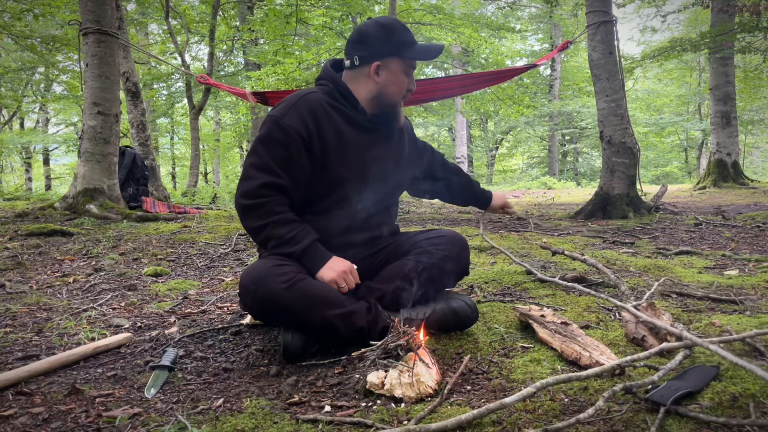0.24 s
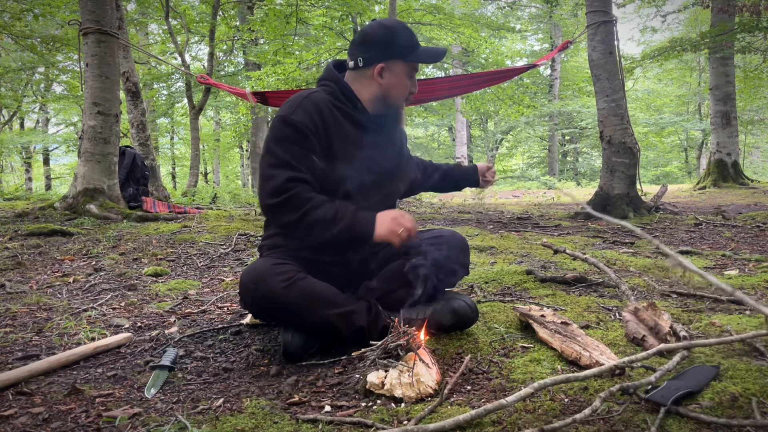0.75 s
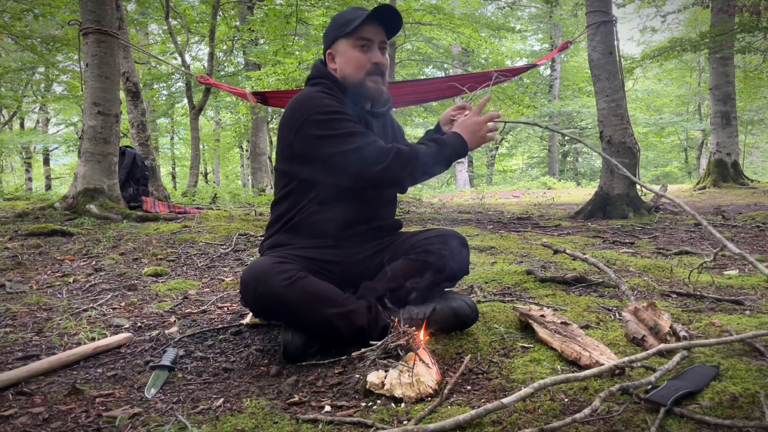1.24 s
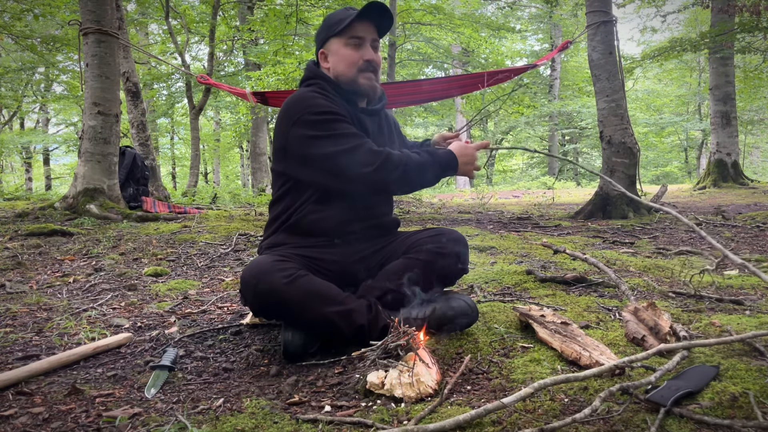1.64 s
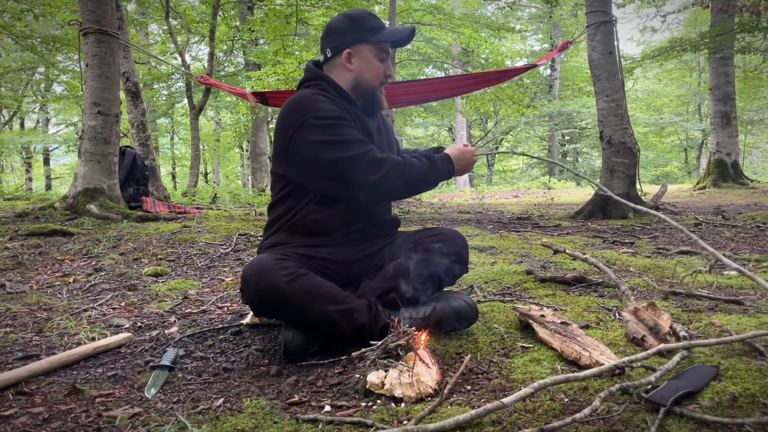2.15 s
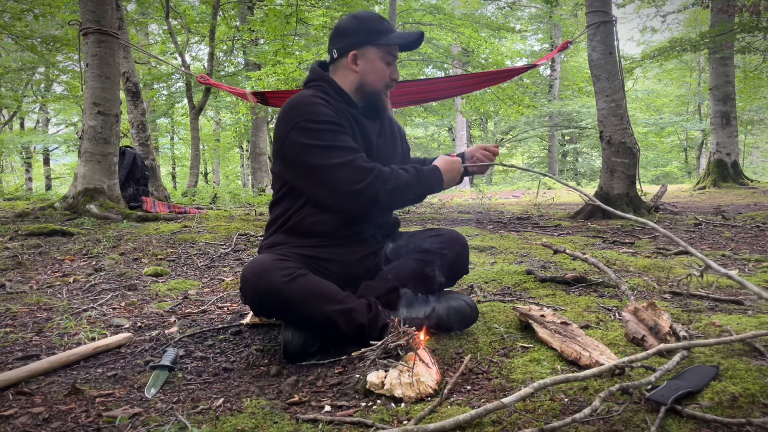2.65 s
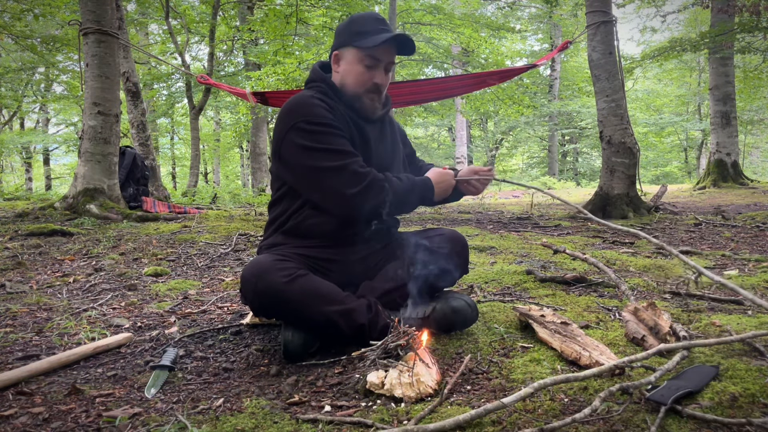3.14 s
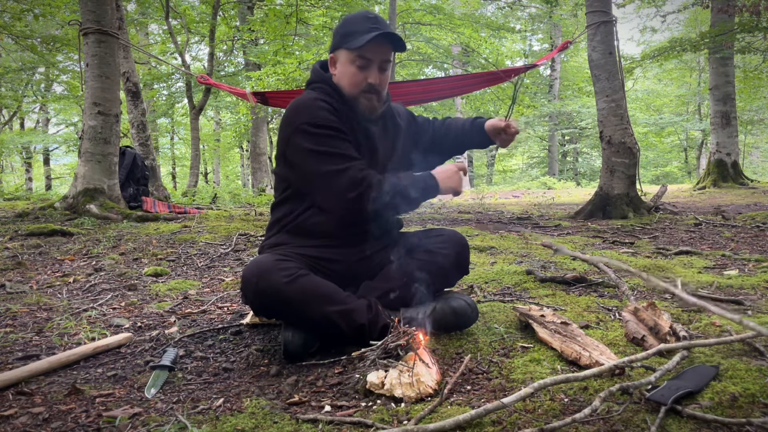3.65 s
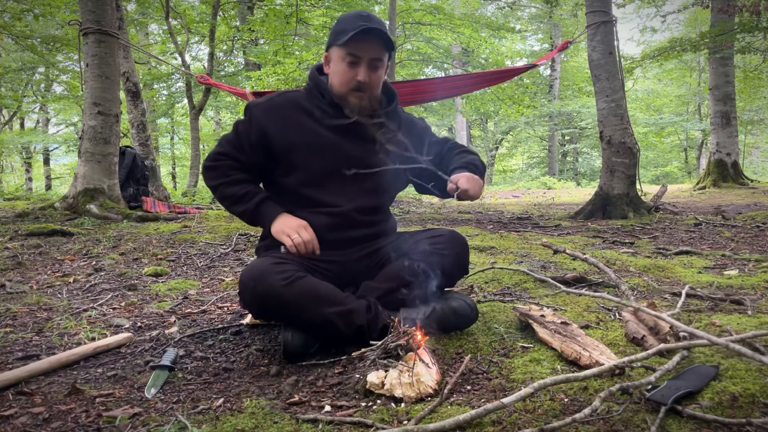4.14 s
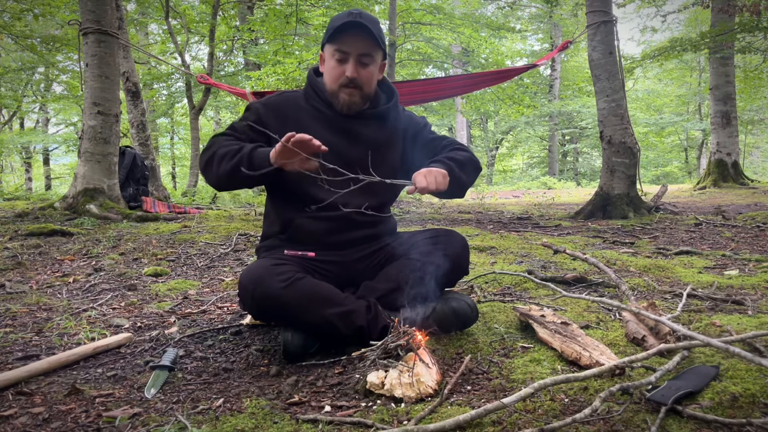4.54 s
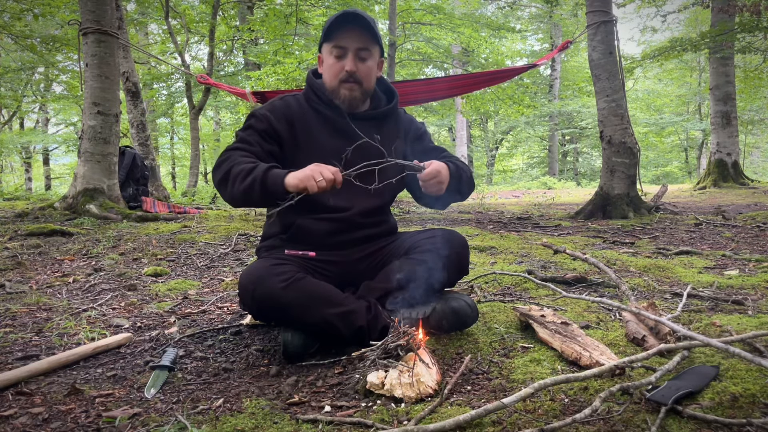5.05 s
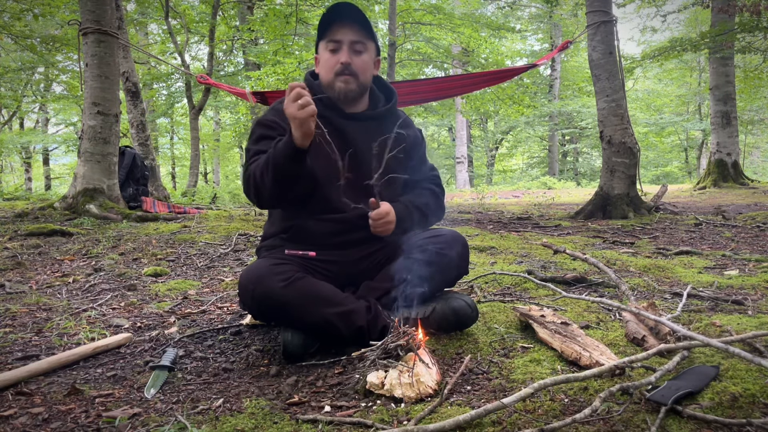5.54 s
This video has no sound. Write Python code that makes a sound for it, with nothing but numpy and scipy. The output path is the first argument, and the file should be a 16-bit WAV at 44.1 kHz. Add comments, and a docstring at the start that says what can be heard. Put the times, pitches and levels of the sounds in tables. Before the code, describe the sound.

Brittle twigs break one after another, each a dry, bright, millisecond-short crack followed by a scattered woodland echo of under half a second. Quiet rustling, crisp ticks and dull soft bumps accompany the branch being pulled about, busiest around two seconds and thinning after four. The stereo microphones stand a few metres off; the background is nearly silent, with only faint leaf hiss and low rumble.

```python
"""In a beech wood, a few metres from a phone, someone drags a dry branch over the litter and snaps twigs. Each
snap is a few milliseconds of tearing fibres that leave the stub ringing; the trunks scatter it back. Each
stroke of the branch drives crunch, leaf hiss, stray ticks and a low rumble; now and then it bumps the ground.
Shaped noise makes the fibres, leaves, rumble and faint canopy hiss; decaying sines make the stubs and twiglets."""
import sys
import numpy as np
from scipy import signal
from scipy.fft import rfft, irfft, next_fast_len
from scipy.io import wavfile
from scipy.ndimage import uniform_filter1d

SR = 44100
rng = np.random.default_rng(int(sys.argv[2]) if len(sys.argv) > 2 else 0)


def store_wav(level_fs):
    """Save 16-bit WAV to argv[1]."""
    pcm = np.round(np.clip(np.atleast_2d(level_fs), -1, 1) * 32767)
    wavfile.write(sys.argv[1], SR, pcm.T.astype(np.int16))


N = 255339

# Fibre bundles giving way. Each row: break in seconds, relative level in dB, build-up in ms, fade in ms,
# low cut in Hz, brightness in dB per octave above 1500 Hz, relative share sent into the trees in dB.
FRACTURES = [(0.0915, -9.5, 1.94, .7, 2318, -0.5, -5.5), (1.4511, -20, 0.59, 1.4, 1810, -1, 1),
             (1.4530, -22, 0.63, 1.2, 1000, -1, -8), (2.2567, -38, 0.49, 0.49, 300, 13, 3),
             (2.2576, -28, 0.3, 0.61, 300, 2, -0.5), (2.2625, -50, 1.5, 5, 300, -5, -2),
             (2.2710, -49.5, 0.7, 3.3, 400, -8, -3), (3.1397, -33, 1.04, 0.64, 1510, 2, -6),
             (3.1448, -17.5, 0.64, 0.41, 1206, 6, -3.5), (3.1483, -30.5, 1.3, 0.62, 1010, 0.5, -2),
             (3.1610, -38, .4, 1.2, 1503, 2, 0.5), (5.3140, -59, .4, 2.9, 1500, 1.5, 2.5),
             (5.3263, -22.5, 0.16, 2.2, 1000, 2, -2), (5.33, -17.5, 0.079, 0.97, 900, 7, 5.5),
             (5.3341, -32, .2, 1.6, 594, -6, 3.5)]
# Freed stubs springing back. Each row: start in seconds, pitch in Hz, level in dB, 60 dB decay time in seconds.
STUBS = [(0.0912, 2630, -18.5, .018), (0.0912, 1900, -26.5, .009), (0.0912, 1560, -29, .011),
         (0.0898, 4700, -19.5, 0.012), (0.0893, 6410, -10.5, .012), (0.0945, 480, -51.5, 0.085),
         (1.4524, 2366, -24.5, 0.012), (1.4522, 1490, -33.5, 0.012), (1.4508, 8800, -22, .012),
         (1.4540, 353, -51.5, 0.073), (2.2574, 6840, -31.5, 0.013), (2.2580, 1250, -40.5, 0.017),
         (3.1447, 2095, -42, 0.027), (3.1447, 1820, -39.5, .014), (3.1449, 1440, -46.5, 0.016),
         (3.1885, 1800, -47, 0.022), (5.3270, 2440, -21.5, 0.015), (5.3266, 4230, -28.5, 0.016),
         (5.3266, 6740, -24, 0.017), (5.3275, 1195, -39.5, 0.0148), (5.3290, 334, -54.5, 0.056)]
# Clearest knocks of twig on twig. Each row: start in seconds, nominal peak in dB, ring in Hz,
# brightness in dB per octave above 1500 Hz.
TICKS = [(0.0024, -34.5, 3750, 3.5), (0.3636, -47, 4600, -3), (0.399, -42, 3930, -2),
         (0.5558, -39.5, 5100, 0.5), (0.5843, -37, 6340, 0), (0.602, -33.5, 6580, 1),
         (0.6179, -37, 3630, 0), (0.8995, -39, 4700, 3), (0.9621, -43.5, 3440, 0.5),
         (0.9988, -48.5, 2460, -7.5), (1.1863, -49, 3118, -2.5), (1.616, -46, 3100, 1),
         (1.7989, -53.5, 1880, -2), (2.0602, -34.5, 3320, -1), (2.0823, -36, 3600, 4.5),
         (2.1368, -40, 3220, -9), (2.2774, -38.5, 3020, -7.5), (2.3376, -44.5, 4700, 5.5),
         (2.9182, -37.5, 4940, 5), (2.9302, -41, 3400, 2.5), (3.1876, -35, 2110, 1.5),
         (3.5119, -43.5, 5030, -1.5), (3.5658, -37, 4950, 2.5), (3.6532, -46, 5780, 2.5),
         (3.7332, -33, 5800, -1.5), (3.8192, -49, 4600, 1), (3.925, -46.5, 5300, -2),
         (4.5593, -56, 2560, 4.5), (4.671, -58.5, 2494, 0.5), (4.7054, -54.5, 5960, 7.5),
         (4.821, -52, 2523, 2), (5.0268, -48.5, 2510, 3), (5.4505, -38.5, 2420, 4)]
# The branch bumps the soil or knocks in the hands. Each row: start in seconds, pitch in Hz,
# envelope peak in dB, length in seconds (twice the time to the peak).
BUMPS = [(0.090, 240, -46, 0.0019), (0.092, 701, -45.5, 0.0018), (0.585, 750, -52.5, .002),
         (1.453, 215, -50, 0.0039), (2.260, 470, -50.5, 0.0051), (2.262, 219, -51.5, 0.014),
         (2.287, 129.3, -48, 0.019), (2.290, 72, -48.5, .045), (3.763, 79.2, -50, 0.041),
         (4.87, 67, -57, 0.038)]
# Bark rubbing along bark. Each row: middle in seconds, length in seconds, relative level in dB, ring in Hz.
SCRAPES = [(0.049, 0.0076, -61, 3630), (0.616, 0.017, -54.5, 5200), (1.18, 0.052, -74, 3160),
           (2.09, 0.15, -61.5, 3200), (2.268, 0.032, -65, 1680), (2.539, 0.014, -72, 4500),
           (3.509, 0.058, -74, 5125), (3.59, 0.022, -64, 5060), (3.868, 0.046, -69.5, 4660),
           (4.715, 0.026, -83, 2600), (5.026, .012, -68, 2520), (5.149, .04, -81, 2510)]
# Pushes and pulls of the branch. Each row: peak in seconds, rise in seconds, fall in seconds,
# then the relative drive in dB of crunch, leaf hiss and low rumble.
STROKES = [(0.396, 0.069, .07, -56, -64.5, -60), (0.46, 0.065, 0.22, -62, -68, -61),
           (0.611, 0.052, 0.051, -57, -74, -63.5), (0.87, 0.17, .11, -64, -71, -60),
           (1.18, .06, .1, -72, -85, -59), (1.55, .04, .04, -70, -90, -56.5),
           (2.095, .15, 0.14, -55, -62, -55.5), (2.275, 0.023, 0.063, -52.5, -62, -51),
           (2.37, 0.069, 0.21, -68.5, -76, -58), (2.98, 0.044, 0.1, -70, -74.5, -61.5),
           (3.275, .03, 0.041, -65, -76, -68), (3.51, .14, 0.1, -68.5, -72.5, -55.5),
           (3.745, .09, 0.11, -61, -69, -58.5), (3.88, 0.12, 0.1, -65.5, -76, -60.5),
           (4.0, .06, .25, -78, -79.5, -73), (4.72, .05, .11, -84, -83, -74),
           (5.41, .1, .07, -65.5, -68.5, -69)]
# The arms recoil after some snaps with a low rumble. Each row: peak in seconds, relative level in dB.
RECOILS = [(0.12, -56.5), (1.47, -57), (3.19, -59.5), (5.5, -64.5)]

# Spectrum of tearing fibres. Each row: frequency in Hz, relative level in dB.
FIBRE_COLOUR = [(150, -20), (400, -18), (800, -20), (1300, -13.5), (2200, -6.5), (3200, -9), (4300, -3.5),
                (6500, -1), (8000, 1), (9500, -2), (11800, -1.5), (14200, -3.5), (16000, -7.5)]
# Spectrum of a twig contact. Each row: frequency in Hz, relative level in dB.
TICK_COLOUR = [(200, -11), (800, -9.5), (2000, -2), (5000, -1), (8000, -1.5), (13000, -2), (14500, -7.5),
               (16000, -17)]
# Spectrum of crunching litter. Each row: frequency in Hz, relative level in dB.
LITTER_COLOUR = [(200, 2), (400, -0.5), (800, -3.5), (1500, -2.5), (3000, -1), (5500, -5), (8000, 2),
                 (10000, -12), (16000, -29)]
# Spectrum of the thinnest leaves. Each row: frequency in Hz, relative level in dB.
LEAF_HISS_COLOUR = [(5000, -31), (8000, -1), (10500, 7), (13000, -0.5), (14500, -11), (16000, -12.5)]
# Spectrum of the low rumble. Each row: frequency in Hz, relative level in dB.
RUMBLE_COLOUR = [(20, -31.5), (35, -18), (48, -7), (65, 0), (105, -5), (140, 0), (190, -10), (280, -15),
                 (450, -28), (900, -42.5), (3000, -71)]
# Spectrum of the canopy hiss. Each row: frequency in Hz, relative level in dB.
CANOPY_COLOUR = [(200, 5.5), (500, 5.5), (1000, 0), (1500, -2), (1900, 0), (2600, -7.5), (5000, -11),
                 (8000, -10.5), (12500, -15), (15000, -17)]
# What the trees send back. Each row: frequency in Hz, relative level in dB.
TREE_COLOUR = [(200, 1.5), (700, 4), (1200, 6), (1800, 1.5), (2600, 0.5), (5000, 2), (8000, -1.5),
               (13500, 0), (14800, -5.5), (16000, -15)]
# How unlike scattered sound is between left and right. Each row: frequency in Hz, side against mid in dB.
WIDTH = [(60, -14.5), (130, -12.5), (290, -8.5), (640, -3), (1400, -3.5), (3000, -4), (5000, -3),
         (7000, -10.5), (9000, -23.5), (15000, -23)]
# The phone's stereo processing. Each row: frequency in Hz, phase by which left leads in radians, left minus
# right in dB.
PHONE_STEREO = [(50, 0, 1.4), (300, -.1, 2.4), (650, -1.2, .7), (1300, -1.8, -1.8), (2200, 0, .2),
                (3400, 1.1, 2.6), (4800, .1, 2.6), (6400, -1.1, 1.8), (8300, -3.1, -.6),
                (10000, -4.5, 0), (12000, -6.3, 1), (13200, -7, 1.2), (15400, -9.5, .5)]

TOP_HZ = 16450
STROKE_RANGE_DB = 20  # a swell gains this much over its rise and loses it over its fall
HISS_STRETCH, RUMBLE_STRETCH = 2, 2.55  # thin leaves and heavy limbs start earlier and settle later than the crunch
RECOIL_RISE_S, RECOIL_FALL_S = .2, .4
TICK_CHATTER_S, TICK_RING_WIDTH_HZ = .012, 230


def amp(db):
    """Decibels to gain."""
    return np.exp(np.asarray(db) * np.log(10) / 20)


def unit(x):
    """Scale to rms 1."""
    return x / np.sqrt(np.mean(x ** 2) + 1e-30)


def along(points, hz, axis=1):
    """Read one column of a spectrum table on a log-frequency axis."""
    points = np.array(points, float)
    return np.interp(np.log(hz + 1), np.log(points[:, 0]), points[:, axis])


def tint(x, points, tilt_db=0):
    """Causal filter with the given spectrum, tilted by tilt_db an octave above 1500 Hz."""
    size = min(x.shape[-1], 8192)
    hz = np.fft.rfftfreq(size, 1 / SR)
    octaves = np.log2(np.maximum(hz, 1500) / 1500)
    # folding the cepstrum onto positive times makes the filter minimum-phase
    cepstrum = irfft(np.log(amp(along(points, hz) + tilt_db * octaves)))
    cepstrum[1:size // 2] *= 2
    cepstrum[size // 2 + 1:] = 0
    response = irfft(np.exp(rfft(cepstrum)))[:size // 2]
    filtered = signal.oaconvolve(x, np.array(response, ndmin=x.ndim), axes=-1)
    return filtered[..., :x.shape[-1]]


def resonate(x, hz, width_hz):
    """One resonance, gain 1 at its centre."""
    b, a = signal.iirpeak(min(hz, SR / 3), max(hz / width_hz, 1), SR)
    return signal.lfilter(b, a, x)


def add(track, s, sound):
    """Mix a sound into a track from time s on."""
    start = int(round(s * SR))
    sound = sound[max(-start, 0):N - start]
    first = max(start, 0)
    track[first:first + len(sound)] += sound


def spread(pair):
    """Two unrelated signals become sound that arrives from many sides."""
    side = tint(pair[1], WIDTH)
    return np.array([pair[0] + side, pair[0] - side])


def crackle(size, scatter_db):
    """Dense tiny clicks of very unequal strength, rms 1."""
    clicks = rng.standard_normal(size)
    strength_db = scatter_db * np.minimum(rng.exponential(size=size), 5)
    return unit(clicks * amp(strength_db))


def swell(s, rise_s, fall_s, db):
    """Gain that climbs evenly in dB to a peak at time s and falls away again."""
    t = np.arange(N) / SR - s
    return amp(db - STROKE_RANGE_DB * np.minimum(np.maximum(-t / rise_s, t / fall_s), 10))


def snaps(splinter_db=-28, splinter_s=0.016):
    """Fibres tear in a growing avalanche, then die away in splinters; returns direct sound and what enters the trees."""
    direct, sent = np.zeros(N), np.zeros(N)
    lead_s = .006  # room for the build-up before the break
    t = np.arange(2048) / SR - lead_s
    for s, db, build_ms, fade_ms, low_hz, bright_db, sent_db in FRACTURES:
        slope_s = np.where(t < 0, build_ms, fade_ms) / 1000
        avalanche = np.exp(-abs(t) / slope_s) * (t > -2 * slope_s)
        splinters = (t > 0) * amp(splinter_db) * np.exp(-abs(t) / splinter_s)
        envelope = avalanche + splinters
        fibres = tint(crackle(len(t), scatter_db=.8) * envelope, FIBRE_COLOUR, bright_db)
        # a thin twig radiates no long waves
        low_cut = signal.butter(2, low_hz, "high", fs=SR, output="sos")
        tear = unit(signal.sosfilt(low_cut, fibres))
        tear = tear * np.sqrt(np.mean(envelope ** 2)) * amp(db)
        add(direct, s - lead_s, tear)
        add(sent, s - lead_s, tear * amp(sent_db))
    return direct, sent


def stubs(rise_s=.0005):
    """Each broken end rings briefly as a decaying sine."""
    out, t = np.zeros(N), np.arange(2048) / SR
    for s, hz, db, t60_s in STUBS:
        envelope = (1 - np.exp(-t / rise_s)) * np.exp(-np.log(1000) * t / t60_s)
        add(out, s, amp(db) * np.sin(2 * np.pi * hz * t) * envelope)
    return out


def motion(jerk_db=2.5):
    """Gains of crunch, leaf hiss and rumble: each stroke drives all three; catching and letting go jerks the first two."""
    power = np.zeros((3, N))
    for s, rise_s, fall_s, *levels in STROKES:
        for layer, db, stretch in zip(power, levels, (1, HISS_STRETCH, RUMBLE_STRETCH)):
            layer += swell(s, rise_s * stretch, fall_s * stretch, db) ** 2
    crunch, hiss, heave = np.sqrt(power)
    wander = unit(uniform_filter1d(rng.standard_normal(N), size=700))
    jerks = unit(amp(jerk_db * wander))
    return crunch * jerks, hiss * jerks, heave


def rustle(crunch, hiss, body_db=-1.0, hiss_db=-0.5):
    """Dry leaves crumple in countless grains under the moving branch; the thinnest ones hiss."""
    out = np.zeros((2, N))
    # leaves catch and let go, so the grains come in clumps
    wander = unit(uniform_filter1d(rng.standard_normal(N), size=130))
    clumps = unit(amp(3 * wander))
    layers = ((crunch, LITTER_COLOUR, body_db), (hiss, LEAF_HISS_COLOUR, hiss_db))
    for gain, colour, db in layers:
        grains = crackle((2, N), scatter_db=4) * clumps
        out += unit(spread(tint(grains, colour))) * gain * amp(db)
    return out


def ticks(rows, contact_s=.0008, chatter_db=-13, ring_db=10, rms_to_peak_db=-22.5):
    """A short scraping contact rings the twig and chatters briefly."""
    out, t = np.zeros(N), np.arange(2048) / SR
    for s, db, hz, bright_db in rows:
        stroke = t / contact_s * np.exp(1 - t / contact_s)
        envelope = stroke + amp(chatter_db) * np.exp(-t / TICK_CHATTER_S)
        contact = tint(crackle(len(t), scatter_db=3) * envelope, TICK_COLOUR, bright_db)
        tick = contact + amp(ring_db) * resonate(contact, hz, TICK_RING_WIDTH_HZ)
        add(out, s, unit(tick) * amp(db + rms_to_peak_db))
    return out


def stray_ticks(crunch, above_db=11.5, scatter_db=6, bright_db=0.5, count=100):
    """Small knocks at random moments, their strength following the branch's movement; rows like those of TICKS."""
    rows = []
    for k, (jitter, pitch, strength) in enumerate(rng.random((count, 3))):
        s = (k + jitter) / count * (N - 1) / SR
        movement_db = 20 * np.log10(crunch[int(s * SR)])
        db = movement_db + above_db + scatter_db * (2 * strength - 1)
        rows.append((s, db, 2500 * 2.5 ** pitch, bright_db))
    return rows


def twiglets(crunch, db=-0.5, ring_s=.002, scatter_db=4, count=1100):
    """Side shoots flick against the litter as the branch moves, each pinging at its own pitch."""
    out, t = np.zeros(N), np.arange(512) / SR
    for when, pitch, strength in rng.random((count, 3)):
        start = int(when * N)
        hz = 2000 * 3.6 ** pitch
        size_db = db + scatter_db * min(-np.log(1 - strength), 3)
        ping = np.sin(2 * np.pi * hz * t) * np.exp(-t / ring_s)
        add(out, start / SR, crunch[start] * amp(size_db) * ping)
    return out


def scrapes(slips_per_s=450):
    """Bark sticks and slips at uneven moments; every slip rings the twig."""
    out, t = np.zeros(N), np.arange(-SR // 6, SR // 6) / SR
    for s, length_s, db, hz in SCRAPES:
        slips = (rng.random(len(t)) < slips_per_s / SR) * rng.standard_normal(len(t))
        ring = resonate(resonate(slips, hz, hz / 5), hz, hz / 2)
        add(out, s + t[0], unit(ring) * amp(db) * np.exp(-(2 * t / length_s) ** 2))
    return out


def bumps():
    """Soft soil or a hand takes the branch with a dull thud, a sine that rises and dies smoothly."""
    out, t = np.zeros(N), np.arange(SR // 4) / SR
    for s, hz, db, length_s in BUMPS:
        u = 2 * t / length_s
        add(out, s, amp(db) * u * np.exp(1 - u) * np.sin(2 * np.pi * hz * t))
    return out


def trunks(x, db=-30, soft_hz=7000, count=14):
    """Ground and nearest trunks each return one distinct echo, dulled by moss and weaker the later it comes."""
    out = np.zeros((2, N))
    moss = signal.butter(2, min(soft_hz, SR / 3), fs=SR, output="sos")
    dulled = signal.sosfilt(moss, x)
    for k, (jitter, side) in enumerate(rng.random((count, 2))):
        delay_s = .004 + .12 * ((k + jitter) / count) ** 2
        for channel, share in zip(out, (side, 1 - side)):
            add(channel, delay_s, dulled * amp(db - 100 * delay_s) * np.sqrt(2 * share))
    return out


def forest(x, t60_mid=0.48, t60_per_octave=0.034, patchy_db=2.5):
    """Countless trunks and twigs scramble the waveform: its energy comes back in patches, the treble fading first."""
    hz, t, sound = signal.stft(x, SR, nperseg=256)
    octaves = np.log2(np.maximum(hz / 4000, 1))
    t60_s = np.maximum(t60_mid - t60_per_octave * octaves ** 2, .1)
    keep = np.exp(-2 * np.log(1000) * t[1] / t60_s)  # energy kept from one frame to the next
    arriving = uniform_filter1d(abs(sound) ** 2, size=3, axis=0)
    power = np.array([signal.lfilter([0, 1 - k], [1, -k], band) for k, band in zip(keep, arriving)])
    wander = uniform_filter1d(rng.standard_normal(power.shape), size=5, axis=0)
    patches = amp(patchy_db * unit(wander))
    phases = np.exp(2j * np.pi * rng.random((2, *power.shape)))
    colour = amp(along(TREE_COLOUR, hz))[:, None]
    echoes = signal.istft(phases * np.sqrt(abs(power)) * patches * colour, SR)[1]
    return spread(echoes[:, :N])


def background(heave, rumble_db=-68, moving_db=-1.5, air_db=-81):
    """A low rumble that swells with every stroke and recoil, and the faint steady hiss of the canopy."""
    rumble = unit(spread(tint(rng.standard_normal((2, N)), RUMBLE_COLOUR)))
    canopy = unit(spread(tint(rng.standard_normal((2, N)), CANOPY_COLOUR)))
    recoil_power = sum(swell(s, RECOIL_RISE_S, RECOIL_FALL_S, db) ** 2 for s, db in RECOILS)
    moving = np.sqrt(heave ** 2 + recoil_power)
    return rumble * np.hypot(amp(rumble_db), moving * amp(moving_db)) + canopy * amp(air_db)


def scene(snap_echo_db=-11.0, stub_echo_db=-21, tick_echo_db=-6.5):
    """Everything happens a few metres in front of the phone, with the wood all around."""
    cracks, sent = snaps()
    crunch, hiss, heave = motion()
    rings = stubs()
    small = ticks(TICKS + stray_ticks(crunch)) + scrapes() + twiglets(crunch)
    echo = forest(sent * amp(snap_echo_db) + rings * amp(stub_echo_db) + small * amp(tick_echo_db))
    direct = cracks + rings + small
    return direct + trunks(direct) + echo + bumps() + rustle(crunch, hiss) + background(heave)


def record(dry):
    """The phone's stereo processing shifts phase and level between left and right; the top is cut steeply."""
    size = next_fast_len(N + 2048)
    hz = np.fft.rfftfreq(size, 1 / SR)
    # each side takes half of the difference
    half = np.exp(.5j * along(PHONE_STEREO, hz)) * amp(along(PHONE_STEREO, hz, axis=2) / 2)
    heard = irfft(rfft(dry, size) * np.array([half, 1 / half]), size)[:, :N]
    top_cut = signal.ellip(8, .2, 70, TOP_HZ, fs=SR, output="sos")
    return signal.sosfilt(top_cut, heard)


dry = scene()
out = record(dry)
store_wav(out)
```